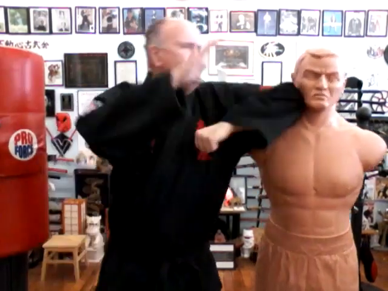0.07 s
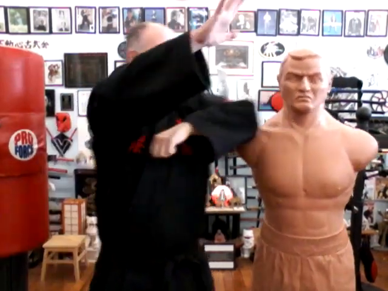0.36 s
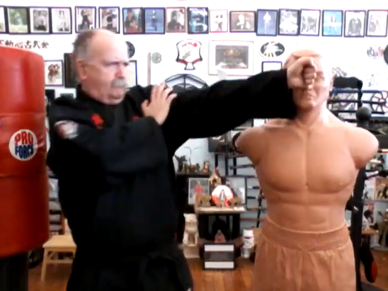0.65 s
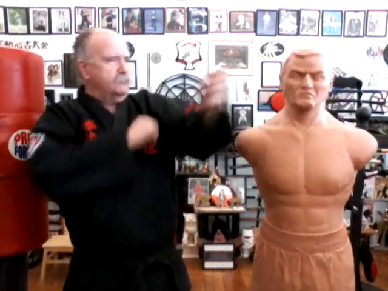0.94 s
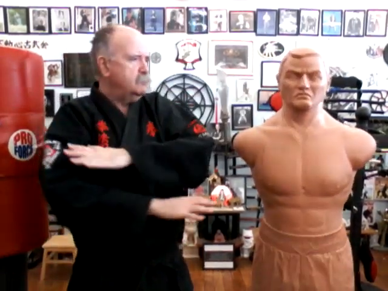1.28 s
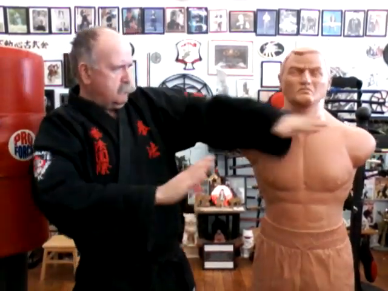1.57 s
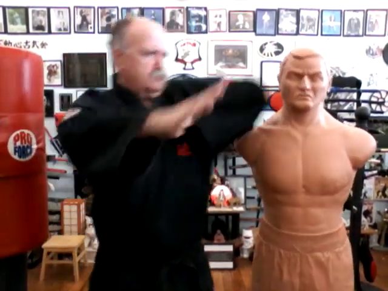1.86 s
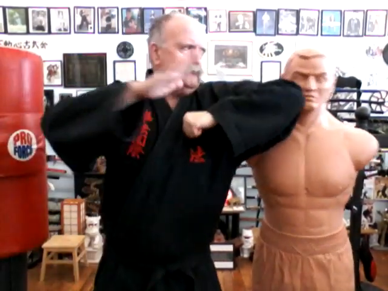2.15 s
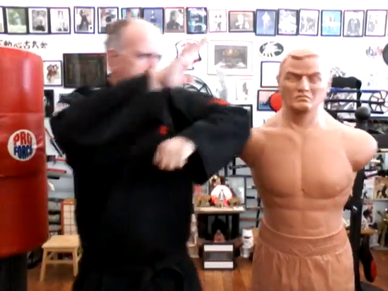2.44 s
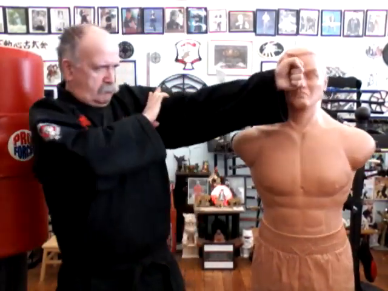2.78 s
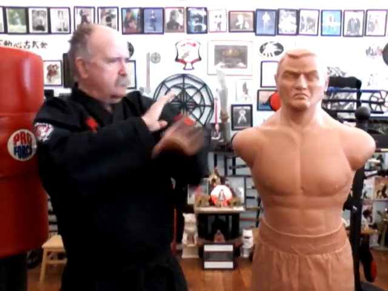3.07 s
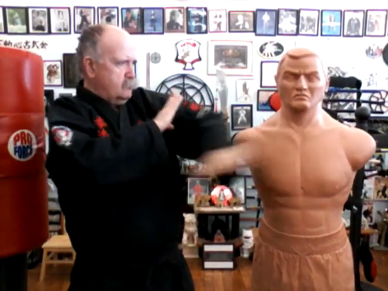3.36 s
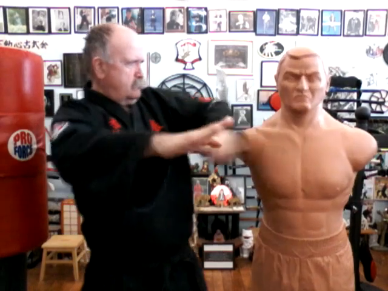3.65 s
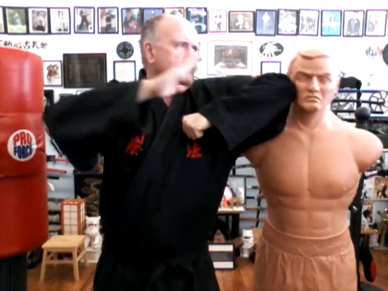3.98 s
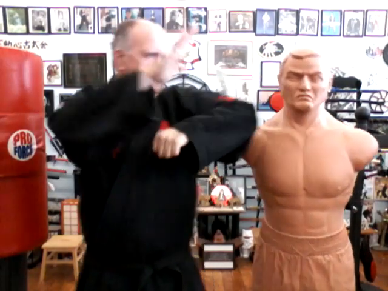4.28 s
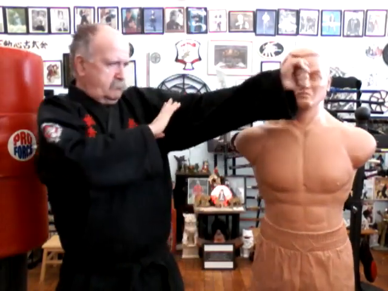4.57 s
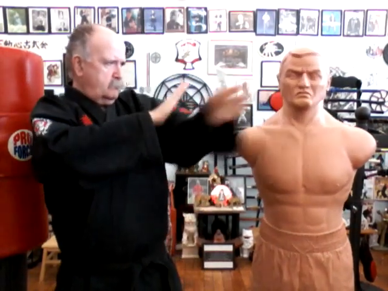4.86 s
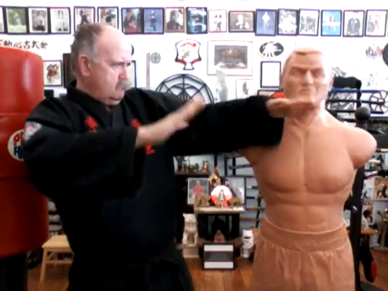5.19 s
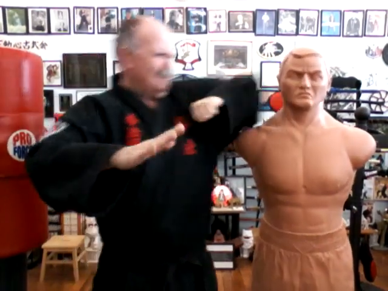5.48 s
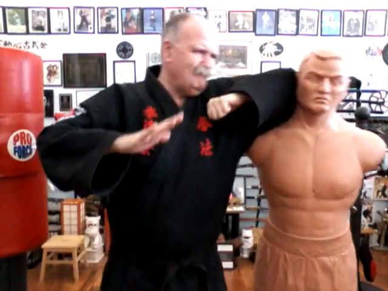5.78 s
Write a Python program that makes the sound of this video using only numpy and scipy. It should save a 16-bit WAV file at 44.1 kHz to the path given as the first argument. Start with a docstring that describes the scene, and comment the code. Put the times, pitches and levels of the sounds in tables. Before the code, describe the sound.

Hands and elbows hit a rubber training dummy in quick slaps and thuds, with heavy sleeves flapping between blows in a room.

```python
"""Slaps and thuds come in quick combinations: hands and elbows strike a rubber training dummy in a
martial arts studio. Each impact pops trapped air, smacks the skin and excites the damped modes of foam
torso, hollow core and base. Heavy cotton sleeves flap and swish between the blows; the dummy rocks
and creaks, and its plastic stand knocks and clicks. A small microphone with an uneven treble
hears it across the room, with the reverberation and a steady noise of air."""
import sys
import numpy as np
from scipy import signal
from scipy.fft import rfft, irfft
from scipy.io import wavfile

SR = 44100
rng = np.random.default_rng(int(sys.argv[2]) if len(sys.argv) > 2 else 0)


def put_to_file(sound):
    """Save the sound as 16-bit audio at rate SR, in the file named by the first command-line argument."""
    columns = np.atleast_2d(sound).T  # one column per channel
    safe = np.clip(columns, -1, 1)
    whole_steps = np.round(safe * 32767)
    wavfile.write(sys.argv[1], SR, whole_steps.astype(np.int16))


N = 261513

# blows on the dummy; levels in all tables are relative:
# (time [s], slap level [dB], thud level [dB], pop level [dB], torso pitch [Hz])
BLOWS = [(0.03, -28.5, -26.5, -11.5, 201), (0.262, -32.5, -31.5, -8.5, 199), (0.698, -16.5, -18.5, -1, 185),
         (0.737, -16.5, -15, -1, 228), (0.789, -26.5, -39, -23, 209), (0.861, -26, -32, -16, 185),
         (1.102, -29.5, -27.5, -18, 218), (1.242, -30.5, -33, -25, 211), (1.636, -16, -21, 1.5, 183.3),
         (1.666, -14.5, -19, 2, 213.6), (1.843, -23.5, -26.5, -6, 238.6), (1.973, -34.5, -26, -11.5, 227),
         (2.026, -32.5, -29, -16, 205), (2.751, -21.5, -21, 0, 204.6), (2.793, -20, -24.5, -24, 211),
         (2.944, -26, -46, -24, 186), (2.96, -25, -28.5, -26, 231.5), (2.973, -23.5, -34, -29, 210),
         (3.581, -19.5, -27, -5, 191), (3.614, -17.5, -19.5, -10, 211), (3.788, -20, -21.5, -28, 232),
         (3.975, -31.5, -33, -17.5, 185), (4.612, -21, -21, -12, 181), (4.646, -19.5, -27, -14, 219),
         (4.815, -22.5, -25.5, -9.5, 228), (5.001, -32.5, -29, -13, 213), (5.128, -32, -30.5, -33, 224),
         (5.246, -18, -22, 1, 206.3), (5.451, -22, -20, -3.5, 234.3), (5.637, -30, -27, -18.5, 201)]


def from_db(db):
    """Amplitude grows tenfold for every 20 dB."""
    return 10 ** (np.asarray(db) / 20)


def rms_one(x):
    """Normalisation to unit mean power."""
    return x / np.sqrt(np.mean(x ** 2) + 1e-20)


def at_hz(points, hz):
    """Interpolation on a logarithmic frequency axis."""
    frequencies, values = np.transpose(points)
    return np.interp(np.log(np.maximum(hz, 1)), np.log(frequencies), values)


def seconds(size):
    """Uniform sampling times."""
    return np.arange(size) / SR


def fade(t, t60):
    """Exponential damping: 60 dB in t60 seconds."""
    return np.exp(-np.log(1000) * t / max(t60, 1e-3))


def add(out, start_s, sound):
    """Superposition: a sound adds to those already there."""
    i = max(round(start_s * SR), 0)
    out[i:i + len(sound)] += sound[:max(len(out) - i, 0)]


def response(points, size=4096):
    """Minimum phase: a magnitude spectrum yields a causal impulse response."""
    gain = from_db(at_hz(points, np.fft.rfftfreq(size, 1 / SR)))
    cepstrum = irfft(np.log(gain))
    cepstrum[1:size // 2] *= 2
    cepstrum[size // 2 + 1:] = 0
    return irfft(np.exp(rfft(cepstrum)))


def colour(x, spectrum):
    """Convolution imposes a spectrum; white noise keeps its power."""
    impulse = response(spectrum)
    return signal.fftconvolve(x, impulse / np.linalg.norm(impulse))[:N]


def bandpass(x, low_hz, high_hz):
    """Band limiting attenuates what lies outside two frequencies."""
    return signal.sosfilt(signal.butter(2, [low_hz, high_hz], "band", fs=SR, output="sos"), x)


def drift(per_s):
    """Random fluctuation of unit rms, linear between knots."""
    knots = rng.standard_normal(int(per_s * N / SR) + 2)
    return rms_one(np.interp(seconds(N) * per_s, np.arange(len(knots)), knots))


def rustle(spectrum, flutter_db=0, per_s=200, grain_db=7):
    """Amplitude modulation breaks noise into fine grains and, with flutter, uneven puffs."""
    grains = rng.standard_normal(N) * from_db(grain_db * np.tanh(drift(1500)))
    puffs = from_db(flutter_db * np.tanh(drift(per_s)))
    return rms_one(colour(grains * puffs, spectrum))


def air(level_db):
    """Stationary broadband noise: the air of the room."""
    # background spectrum: (frequency [Hz], level [dB])
    spectrum = [(25, -10), (60, -4), (130, -26), (350, -4), (1000, -8.5), (3000, -9), (6000, -10.5),
                (10000, -9.5), (15000, -4)]
    return from_db(level_db) * rms_one(colour(rng.standard_normal(N), spectrum))


def swell(t, modes, scale, squash_s):
    """Damped modes build up as the foam is squashed, with new strengths and phases on every blow."""
    ring = sum(from_db(db + rng.normal(0, 1)) * fade(t, t60)
               * np.sin(2 * np.pi * (pitch * scale * t + rng.random())) for pitch, db, t60 in modes)
    return ring * (1 - np.exp(-t / squash_s))


def slap(t, contact_t60, shiver_db, shiver_t60):
    """Noise with a double decay: the hand flattens quickly on the rubber, the sleeve shivers on."""
    spray = rng.standard_normal(len(t)) * (1 - np.exp(-t / 0.00042))
    return spray * (fade(t, contact_t60) + from_db(shiver_db) * fade(t, shiver_t60))


def blows(pop_db, boom_db, thud_db, core_db, smack_db, crack_db, trap_s):
    """Impact excitation: each blow rings the body's modes and slaps the skin. Returns body and skin."""
    # modes of the stem and weighted base: (frequency [Hz], level [dB], t60 [s])
    base_modes = [(71.4, 2, 0.2), (90.3, -8.5, 0.36), (103.2, -1, 0.31), (125.1, 3.5, 0.15)]
    # modes of the foam torso: (ratio to its pitch [1], level [dB], t60 [s])
    torso_modes = [(0.619, -10, 0.095), (0.941, -0.5, 0.11), (1.119, -2.5, 0.091), (1.42, -4.5, 0.12),
                   (1.85, -12, 0.067)]
    # modes of the hollow plastic core: (frequency [Hz], level [dB], t60 [s])
    core_modes = [(198, -4.5, 0.13), (304.5, -10.5, 0.15), (387.7, -14.5, 0.092), (524.7, -8, 0.12),
                  (863, -11, 0.079), (1280, -12, 0.064)]
    # spectra of the skin's smack and brighter crack: (frequency [Hz], level [dB])
    smack_spectrum = [(60, -23.5), (200, 7.5), (450, -1.5), (900, 1), (1800, -2), (3000, -10),
                      (8000, -29.5)]
    crack_spectrum = [(600, -32), (1800, 8), (3000, 5), (5500, 9), (7000, 8.5), (10000, -3), (12000, -17),
                      (15000, -16.5)]
    firm_db, firm_torso_hz, firm_pop_hz = -20, 197.7, 672  # a firm blow as the reference
    t, lead = seconds(20000), seconds(700)
    body, smacks, cracks = np.zeros((3, N))
    for s, smack, thud, pop, torso_hz in BLOWS:
        crack = 1.53 * (smack - firm_db)  # harder blows are brighter
        boom = 0.73 * (thud - firm_db)  # the heavy base evens the blows out
        pop_hz = firm_pop_hz * (firm_torso_hz / torso_hz) ** 2.83
        # air trapped under the hand escapes just after the first touch
        add(body, s + trap_s, from_db(pop + pop_db) * np.sin(2 * np.pi * pop_hz * t) * fade(t, 0.009))
        add(body, s, from_db(boom + boom_db) * swell(t, base_modes, 1, squash_s=0.01))
        add(body, s, from_db(thud + thud_db) * swell(t, torso_modes, torso_hz, squash_s=0.0057))
        add(body, s, from_db(thud + core_db) * swell(t, core_modes, 1, squash_s=0.0032))
        add(smacks, s, from_db(smack + smack_db) * slap(t, 0.04, shiver_db=-12.5, shiver_t60=0.39))
        add(cracks, s, from_db(crack + crack_db) * slap(t, 0.022, shiver_db=-12, shiver_t60=0.42))
        # the loose sleeve lands a moment before the hand, 7 dB softer
        brush = rng.standard_normal(len(lead)) * fade(lead, 0.013)[::-1]
        add(smacks, s - lead[-1], from_db(smack + smack_db - 7) * brush)
    return body, colour(smacks, smack_spectrum) + colour(cracks, crack_spectrum)


def swings():
    """Incoherent sources add in power: arm swings sum to envelopes of flapping and rubbing."""
    # arm movements: (time of full speed [s], length [s], flap level [dB], rub level [dB])
    movements = [(0.07, 0.12, -34, -40.5), (0.194, 0.082, -36, -35), (0.31, 0.19, -35.5, -38.5),
                 (0.473, .08, -39, -43), (0.894, 0.19, -36.5, -38.5), (1.113, 0.049, -38, -39.5),
                 (1.203, 0.11, -35, -42.5), (1.394, 0.21, -44.5, -45), (1.726, 0.052, -38, -37),
                 (1.816, 0.13, -30, -60), (2.03, 0.3, -40, -41), (2.31, 0.27, -40.5, -49),
                 (2.58, 0.21, -44.5, -55.5), (2.818, 0.11, -34, -43), (3.196, 0.22, -48, -50.5),
                 (3.687, 0.055, -37, -40), (3.753, 0.089, -36, -50), (3.985, 0.25, -40.5, -41.5),
                 (4.157, 0.12, -66, -45.5), (4.706, 0.11, -31, -42), (5.058, 0.23, -44.5, -52),
                 (5.426, .14, -47, -47), (5.705, 0.27, -35, -40.5)]
    roundness = 1.404  # 1 a sharp peak, 2 a round bell
    t, power = seconds(N), np.zeros((2, N))
    for s, length, flap_db, rub_db in movements:
        speed = np.exp(-np.abs(2 * (t - s) / length) ** roundness)
        power += from_db([[flap_db], [rub_db]]) ** 2 * speed
    return np.sqrt(power)


def jacket(flap, rub, flap_db, swish_db, weave_db):
    """Cloth flaps in puffs and swishes by friction; the weave's hiss grows faster than the rubbing."""
    # spectra of flapping cloth, rubbing sleeves and fine weave: (frequency [Hz], level [dB])
    flap_spectrum = [(100, -29.5), (350, -4), (900, 4.5), (1800, -10), (3000, -5.5), (8000, -33)]
    swish_spectrum = [(700, -17), (2000, 2), (3000, -3.5), (5500, -0.5), (7000, -0.5), (12000, -17)]
    weave_spectrum = [(3000, -43), (5500, 0), (7000, 0.5), (10000, -9.5), (12000, -17), (15000, -26)]
    brisk_rub = from_db(-46)
    flapping = from_db(flap_db) * flap * rustle(flap_spectrum, flutter_db=5.5, per_s=140)
    swish = from_db(swish_db) * rub * rustle(swish_spectrum)
    hiss = from_db(weave_db) * (rub / brisk_rub) ** 1.35 * rustle(weave_spectrum)
    return flapping + swish + hiss


def creaks(flap, level_db, per_s, spread_db, count=10):
    """Stick-slip friction: during swings, tiny random slips of rubber on plastic ring a few cycles."""
    t, out = seconds(1000), np.zeros(N)
    for hz in np.geomspace(650, 1600, count):
        slips = (rng.random(N) < per_s / count / SR) * from_db(spread_db * rng.random(N))
        ring = np.sin(2 * np.pi * hz * t) * t * fade(t, 0.0095)
        out += signal.fftconvolve(slips, ring)[:N]
    return from_db(level_db) * flap * rms_one(out)


def rocking(flap, level_db, stance_db, rise_s, t60):
    """Damped rocking: every thud tips the dummy, and its base rumbles until it settles."""
    # rumble of base and floor: (frequency [Hz], level [dB])
    spectrum = [(25, -21), (45, -6), (70, 3), (120, -2.5), (220, -1), (400, -7.5), (800, -15.5),
                (3000, -35.5)]
    t, power = seconds(N), np.zeros(N)
    settle = (1 - np.exp(-(t / rise_s) ** 2)) * fade(t, t60)
    for s, _, thud, _, _ in BLOWS:
        add(power, s, (from_db(thud) * settle) ** 2)
    # the floor also rumbles as the fighter's weight shifts with each swing
    strength = np.hypot(from_db(level_db) * np.sqrt(power), from_db(stance_db) * flap)
    return strength * rustle(spectrum, flutter_db=5.0, per_s=50)


def knocks(level_db, rise_s):
    """Inharmonic resonance: hollow plastic rings briefly under a soft contact."""
    # the stem knocks in its socket: (time [s], peak level [dB], pitch [Hz], t60 [s])
    contacts = [(0.182, -16, 1330, 0.0057), (0.847, -8.5, 890, 0.023), (0.858, -2.5, 1146, 0.0045),
                (1.175, -21, 1303, 0.022), (1.196, -17.5, 1030, 0.0096), (1.214, -19, 886, 0.053),
                (1.418, -25, 770, 0.0055), (1.802, -18.5, 970, 0.02), (2.011, -14, 706, 0.015),
                (2.18, -21.5, 884, 0.013), (2.458, -26.5, 880, 0.01), (2.699, -32, 950, 0.0064),
                (2.815, -11, 960, 0.013), (3.255, -29, 810, 0.0078), (3.281, -33, 844, 0.034),
                (4.483, -32, 890, 0.0052), (4.672, -9, 1026, 0.0074), (4.924, -27.5, 1300, 0.018),
                (5.129, -24.5, 1215, 0.037), (5.406, -21.5, 972, 0.025), (5.776, -7, 1030, 0.011)]
    partials = [(0.7, 0.26), (1, 0.96), (1.45, 0.49), (2.3, 0.21)]  # (pitch ratio [1], amplitude [1])
    t, out = seconds(3000), np.zeros(N)
    onset = 1 - np.exp(-(t / rise_s) ** 2)
    for s, db, hz, t60 in contacts:
        ring = sum(gain * np.sin(2 * np.pi * hz * ratio * t) for ratio, gain in partials)
        knock = ring * fade(t, t60) * onset
        add(out, s, from_db(db + level_db) * knock / np.abs(knock).max())
    return out


def clicks(level_db, slip_s, grit_db):
    """Frictional excitation: a rough slip rings a joint of the stand; pinching damps and dulls it."""
    # slips, pitched by the stem's lean: (time [s], peak level [dB], low mode [Hz], freedom [0-1])
    slips = [(0.379, -18, 1837, 0.77), (0.902, -12, 1970, 0.43), (0.974, -10.5, 1805, 0.77),
             (1.034, -12, 1800, 0.92), (2.288, -20.5, 1800, 0.27), (2.378, -34.5, 1420, 0.24),
             (2.557, -29.5, 1480, 0.27), (2.643, -39, 1950, 0.28), (3.16, -39, 1860, 0.17),
             (3.927, -19, 1836, 0.86), (4.39, -44.5, 1750, 0.5), (5.1932, -23, 1896, 0.71)]
    # upper modes of the joint: (frequency [Hz], level [dB], t60 when free [s])
    upper_modes = [(3140, -14.5, 0.013), (3540, -15, 0.044), (4250, -9.5, 0.047), (4690, -7, 0.041),
                   (5070, -3, 0.028), (5410, 1, 0.019), (5770, -1, 0.036), (8210, 2.5, 0.018),
                   (9460, -2, 0.021)]
    free_treble_db, pinch_db = 6.5, -27
    t, out = seconds(4000), np.zeros(N)
    for s, db, low_hz, freedom in slips:
        treble_db = free_treble_db + pinch_db * (1 - freedom)
        modes = [(low_hz, 0, 0.028), (low_hz * 0.89, -8, 0.015)]
        modes += [(hz * rng.normal(1, 0.016), mode_db + treble_db, t60)
                  for hz, mode_db, t60 in upper_modes]
        ring = sum(from_db(mode_db) * fade(t, t60 * freedom)
                   * np.sin(2 * np.pi * (hz * t + rng.random())) for hz, mode_db, t60 in modes)
        grit = from_db(grit_db) * bandpass(rng.standard_normal(len(t)), 900, 6000) * fade(t, 0.031)
        click = (ring + grit) * (1 - np.exp(-t / slip_s))
        add(out, s, from_db(db + level_db) * click / np.abs(click).max())
    return out


def ticks(level_db, t60):
    """Broadband transients: very short bursts of noise are heard as bright snaps."""
    # thin, sharp ticks: (time [s], level [dB])
    snaps = [(0.891, -28), (1.9446, -47)]
    # (frequency [Hz], level [dB])
    spectrum = [(1500, -30), (3000, -20), (4400, -1), (6000, -4), (10500, -1.5), (13000, -24),
                (15000, -12)]
    t, out = seconds(600), np.zeros(N)
    for s, db in snaps:
        add(out, s, from_db(db + level_db) * rng.standard_normal(len(t)) * fade(t, t60))
    return colour(out, spectrum)


def studio(x, wet_db, early_db, early_t60, stances=12):
    """Reverberation: early echoes and a tail dying band by band shift as fighter and dummy move."""
    # decay of the room: (frequency [Hz], t60 [s])
    decay_times = [(70, 0.18), (250, 0.51), (1000, 0.49), (4000, 0.46), (12000, 0.23)]
    t = seconds(32000)
    edges_hz = np.geomspace(30, 18000, 11)
    white = rng.standard_normal((2, stances, len(t)))
    tails = 0
    for k, (low, high) in enumerate(zip(edges_hz, edges_hz[1:])):
        t60 = at_hz(decay_times, np.sqrt(low * high))
        tails = tails + bandpass(white[k % 2], low, high) * fade(t, t60)
    onset = np.clip((t - 0.004) / 0.0018, 0, 1)
    out, hop = np.zeros(N), N // (stances - 1)
    for k, tail in enumerate(tails * onset):
        early = rng.standard_normal(len(t)) * fade(t, early_t60) * (t > 0.002)
        echo = from_db(wet_db) * tail / np.linalg.norm(tail)
        echo += from_db(early_db) * early / np.linalg.norm(early)
        # each stance hands over smoothly to the next
        span = np.arange(max((k - 1) * hop, 0), min((k + 1) * hop, N))
        crossfade = np.cos(np.pi / 2 * (span / hop - k))
        add(out, span[0] / SR, signal.fftconvolve(x[span] * crossfade, echo))
    return out


def scene():
    """Superposition of dummy, stand and jacket with the studio's echoes and air noise."""
    body, skin = blows(pop_db=-5, boom_db=-28, thud_db=3.0, core_db=3.5, smack_db=3.0, crack_db=-17.5,
                       trap_s=0.0012)
    stem = knocks(level_db=-0.5, rise_s=0.00091)
    joint = clicks(level_db=6.5, slip_s=0.0015, grit_db=-3) + ticks(level_db=30.5, t60=0.0032)
    # directivity: low thuds spread all round the room, bright sounds mostly straight ahead
    spread = from_db(-1.5) * body + from_db(-11) * skin + from_db(-9) * stem + from_db(-11) * joint
    room = studio(spread, wet_db=-5.5, early_db=-6.5, early_t60=0.22)
    background = air(level_db=-48.5)
    flap, rub = swings()
    rumble = rocking(flap, level_db=-15.5, stance_db=-4.5, rise_s=0.087, t60=1.42)
    cloth = jacket(flap, rub, flap_db=-4.0, swish_db=1, weave_db=-46.5)
    rubber = creaks(flap, level_db=-13, per_s=110, spread_db=12.5)
    return (body + skin + stem + joint + room + rumble + cloth + rubber + background)[None]


def record(dry):
    """Transduction: the microphone colours the treble, saturation rounds peaks, the top is cut."""
    # frequency response of the microphone: (frequency [Hz], gain [dB])
    microphone = [(20, -24.5), (60, 1.5), (1900, -1), (2330, -16.5), (2750, 2.5), (3100, 1.5), (3600, -9.5),
                  (4000, -0.5), (4330, -12), (4800, -3.5), (5600, -13), (6300, -23.5), (8000, -32),
                  (12000, -32.5)]
    ceiling, cutoff_hz = 0.73, 15700
    heard = signal.fftconvolve(dry, response(microphone)[None])[:, :N]
    rounded = ceiling * np.tanh(heard / ceiling)
    return signal.sosfilt(signal.ellip(10, 0.2, 70, cutoff_hz, fs=SR, output="sos"), rounded)


dry = scene()
out = record(dry)
put_to_file(out)
```